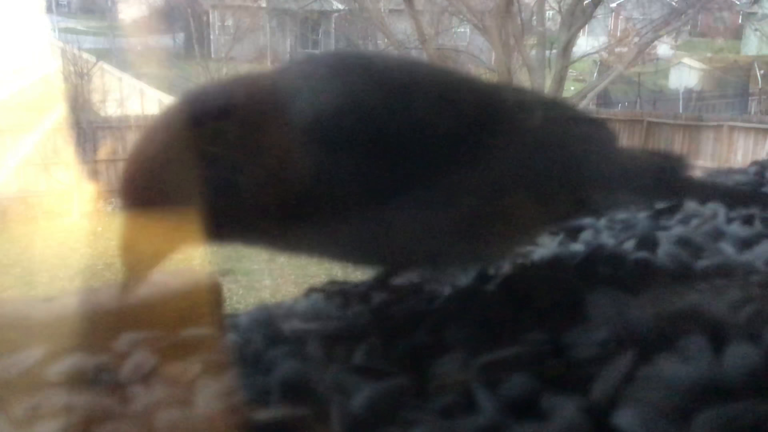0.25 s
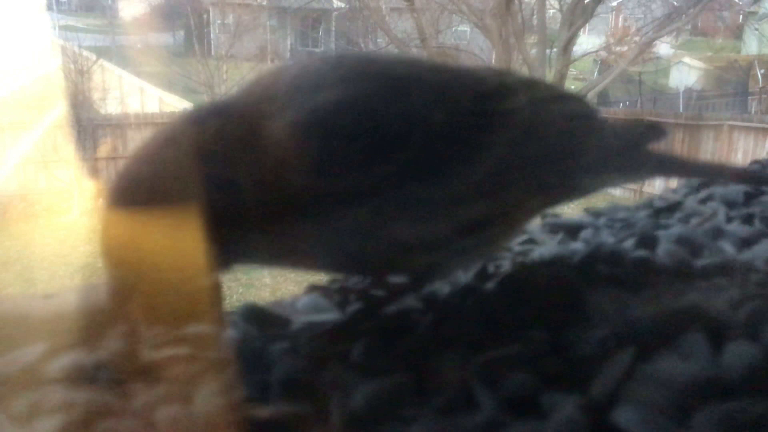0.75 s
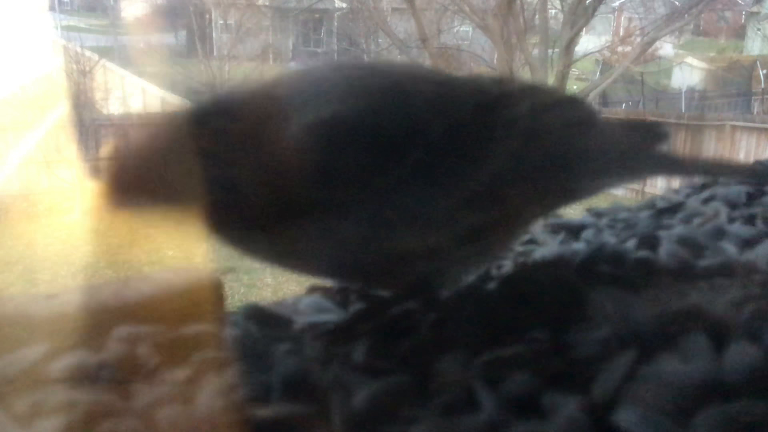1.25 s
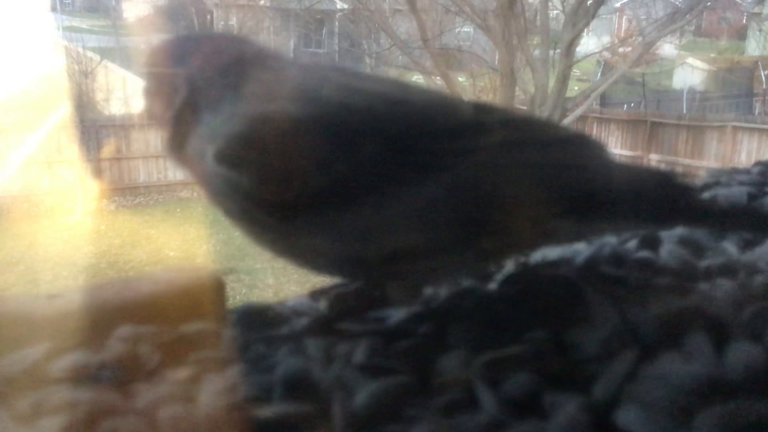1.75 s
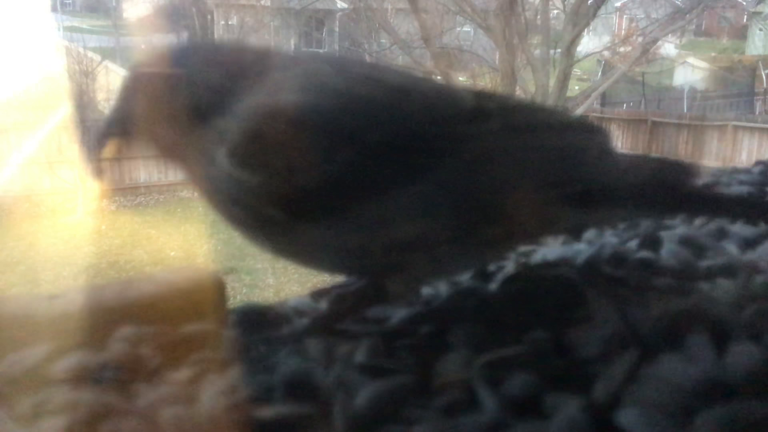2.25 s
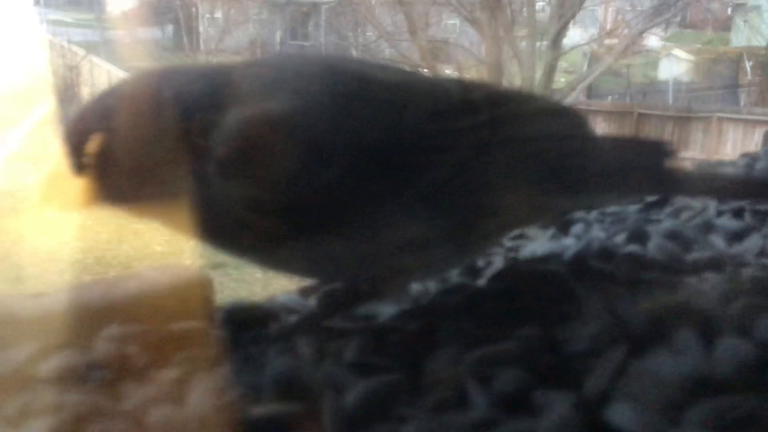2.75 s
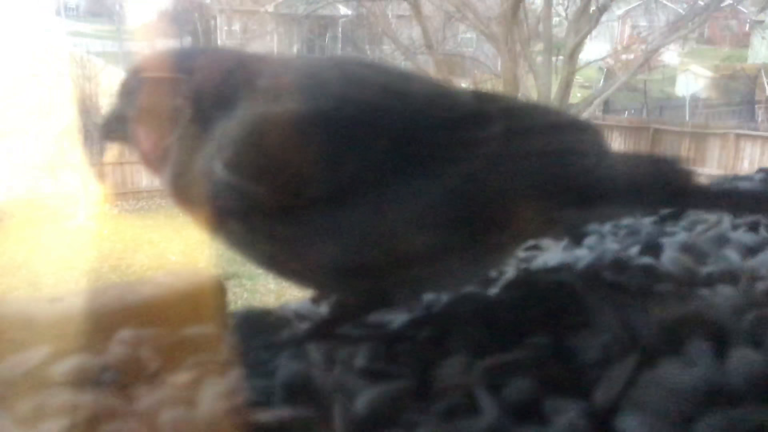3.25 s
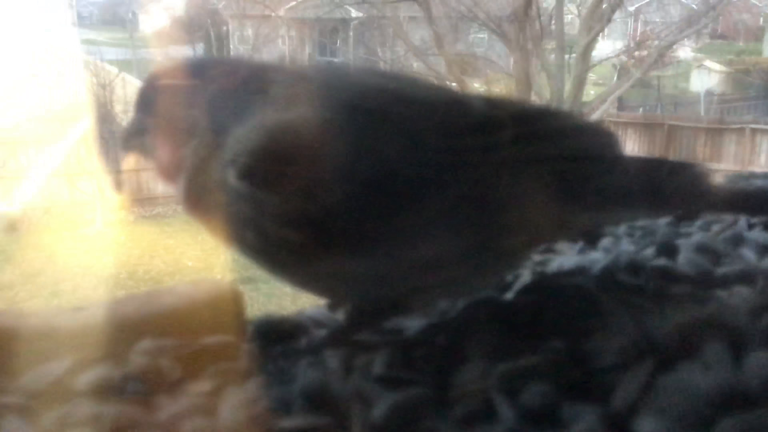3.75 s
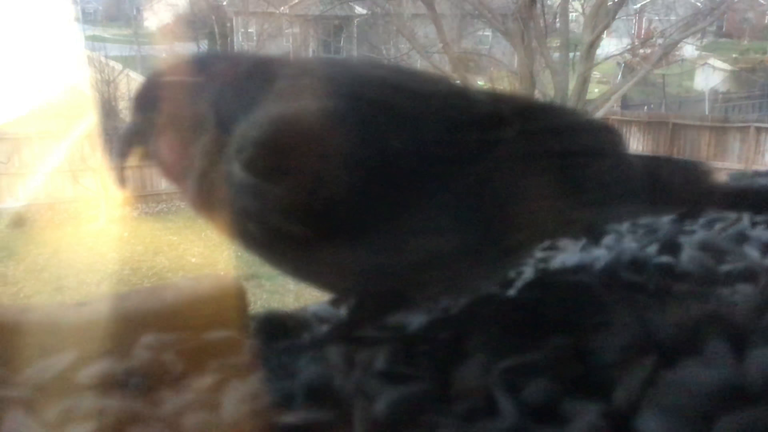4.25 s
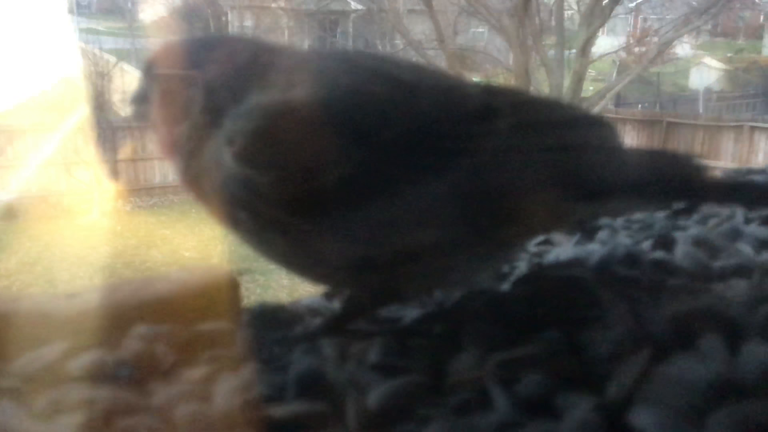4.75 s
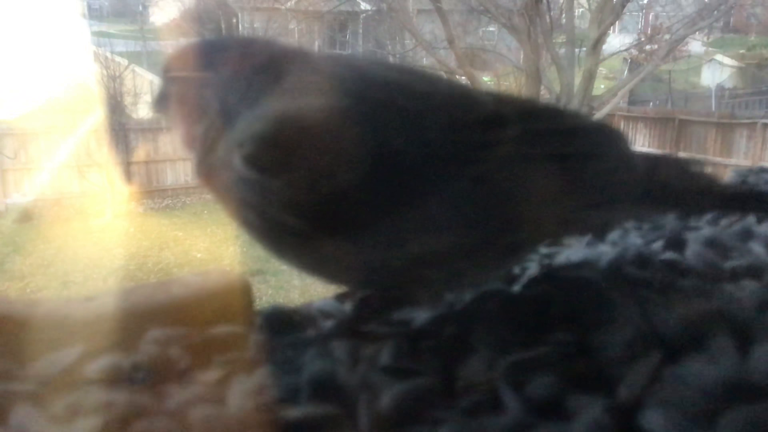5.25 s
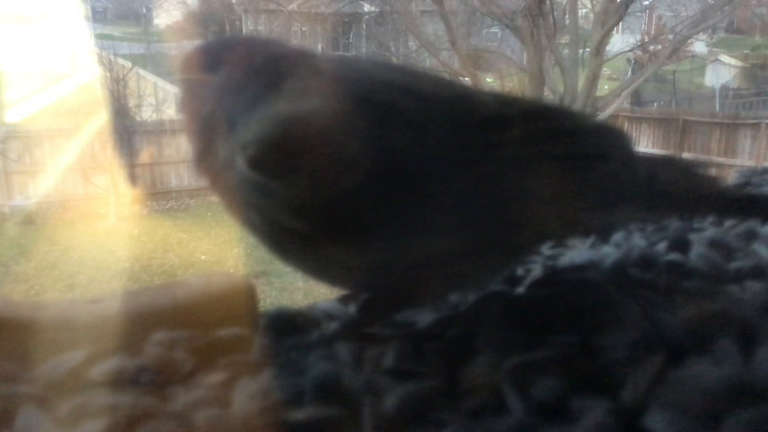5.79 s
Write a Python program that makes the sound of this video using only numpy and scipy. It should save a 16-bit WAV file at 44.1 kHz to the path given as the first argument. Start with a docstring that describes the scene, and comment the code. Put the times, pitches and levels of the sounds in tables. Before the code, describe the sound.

Sharp, irregular pecks and seed clicks with brief dry rustles sound through a window pane, over a low wavering indoor hum and faint hiss.

```python
"""Bird at a window feeder

A small bird picks at seeds in a feeder fixed to a window, heard from the room behind the glass.
Pecks and seed snaps cross the pane as quick falling chirps; loose seeds tick and rustle around them.
Indoors two wavering low tones throb over rumble and faint hiss, with a few soft low shuffles
and one faint swish, both made of swelling random contacts."""
import sys
import numpy as np
from scipy import signal
from scipy.fft import rfft, irfft
from scipy.io import wavfile
from scipy.ndimage import uniform_filter1d

SR = 44100
rng = np.random.default_rng(int(sys.argv[2]) if len(sys.argv) > 2 else 0)


def master(y):
    """Save y as 16-bit WAV."""
    cut = np.clip(np.atleast_2d(y).T, -1, 1)
    pcm = np.round(cut * 32767)  # scale
    wavfile.write(sys.argv[1], SR, pcm.astype(np.int16))


N = 265482

# Pecks and seed snaps: (time [s], strength [dB], knock pitch [Hz], thump near 300 Hz [dB],
# edge near 3.5 kHz [dB], snap near 8 kHz [dB]); last three re knock, before the trims in contact_points
PECK_EVENTS = [(0.1929, -31.5, 980, 7, 0.5, 13), (0.321, -20, 1400, -9, -11, -16),
               (0.4592, 16, 883, -12, -28, -48), (0.462, -0.5, 1740, -28, -22, -39),
               (0.65, -18.5, 1420, -2, -32, -27), (1.078, -8, 950, 0.5, -17.5, -21),
               (1.1597, -12, 900, -4, -10.5, -20), (1.2281, -13, 1090, -5.5, -20.5, -31),
               (1.4231, -3.5, 1430, -7, -26, -46), (1.4395, -4.5, 1430, -12, -9, -8),
               (1.458, 1.5, 1370, -19, -8.5, -16), (1.4663, -6, 1270, -13, -7, -33),
               (1.4995, 12.5, 1300, -7, -21.5, -34), (1.509, -7.5, 1190, -11, -5, -8.5),
               (1.5516, -21, 1260, -14, -5, -1), (1.5645, -12, 1390, -7, -3, -6),
               (1.602, -15, 1290, -12, -7, -9), (1.6191, -9.5, 1300, -11, -1, 2),
               (1.6235, -2.5, 1280, -27, -5, -7), (1.6645, 2, 1370, -23, -1.5, -4),
               (1.7027, -13, 1280, -24, -12, -20), (1.763, -24, 1130, -8, -13, -27),
               (1.7805, -13, 1260, -19, -12.5, -13.5), (2.1508, -7, 1160, -29, -18.5, -21.5),
               (2.1542, 7, 1090, 0.5, -25.5, -48), (2.1855, -21, 980, -6, -12.5, -13),
               (2.7113, -14.5, 940, 9, -35, -36), (3.0795, -18, 850, 8, -22.5, -36.5),
               (3.2716, -19, 1070, 5, -3.5, -11), (3.2979, -21, 1235, 4, -5, -4.5),
               (3.3185, 5, 1160, -10, -16.5, -16.5), (3.3212, -5, 1420, -4, -7, -15),
               (3.3864, -12.5, 1167, -14, -2.5, -15.5), (3.4152, -11.5, 1087, -16, -6, -14),
               (3.5088, -14.5, 1310, -8, -5.5, -13.5), (3.6399, 0, 1125, -6.5, -13.5, -45),
               (3.653, -18, 1160, -8, -11, -23.5), (3.9315, -28.5, 1255, -3, -9, -17),
               (3.9565, -41.5, 780, -5, 4, 3), (4.5458, -13, 1211, -1.5, -6.5, -27),
               (4.5759, -21, 1190, 0, -1, -14), (4.7393, -19, 1190, 5, -12.5, -19),
               (4.9873, -5.5, 1285, -4.5, -5.5, -13), (5.0008, -7, 1438, -0.5, -0.5, 0),
               (5.031, -10, 1155, -12, 5, 2), (5.0354, -10.5, 1180, -6, -6, 8.5),
               (5.0416, 0, 1400, -20, 2, -9), (5.044, -3, 1250, -14, -18, -5),
               (5.0558, -13, 1380, -20, -1, 6), (5.0825, 8, 1270, -3, -7, -5),
               (5.0963, -9, 1230, -19, -10, -13), (5.1983, -10, 920, -11, -13, -18),
               (5.209, -18, 1111, -14, -14, -2.5), (5.2372, -18, 1340, -9, -3, -0.5),
               (5.2765, -21, 1068, -11, -4, -8), (5.2909, -7, 1245, -17.5, -10.5, -16),
               (5.497, -11, 1240, -0.5, -10.5, -12.5), (5.503, -10.5, 1450, -8, -19, -38)]
# Loose seeds tumbling: (start [s], end [s], first tick strength [dB], last tick strength [dB]), before scatter
SPILL_EVENTS = [(1.385, 1.478, -23, -11.5), (1.485, 1.595, -19, -23), (3.33, 3.444, -21, -27),
                (3.485, 3.544, -25, -26), (4.529, 4.651, -24.5, -32.5), (4.996, 5.075, -16, -17),
                (5.116, 5.281, -22, -22.5)]
# Feeder and pane resonances: (frequency [Hz], width [Hz], lift [dB]); negative lift is a notch
FEEDER_MODES = [(268.3, 29, 7.5), (319.5, 18, -7.5), (387.5, 27, 6), (1413, 210, 6), (2090, 280, 4),
                (2700, 360, 5.5), (3146, 82, 4), (4640, 210, 4), (5180, 230, 5.5), (6710, 750, 7),
                (8800, 950, 5.5), (11700, 290, 2.5), (13500, 1000, -4)]
# Pane and room ring: (band centre [Hz], level re direct sound of a 3 dB blow [dB], t60 [s], rise [s])
RING_BANDS = [(130, 4, 0.055, 0.005), (298, 3, 0.055, 0.00084), (730, -8.5, 0.075, 0.00058),
              (1460, -4.5, 0.035, 0.00024), (3100, -10, 0.019, 0.0005), (6900, -15.5, 0.03, 0.00049),
              (15000, -22.5, 0.02, 0.00081)]
# Bird stirring the seeds: (start [s], fullest [s], end [s], level [dB], brightness [dB per octave]);
# the sound is cut at its end, even if that comes before the fullest point
STIR_EVENTS = [(.30, .328, 0.36, -52.5, -4), (.70, .77, 0.93, -63.5, -2), (1.03, 1.085, 1.2, -55.5, -2),
               (1.385, 1.44, 1.53, -44.5, 0.5), (1.47, 1.495, 1.58, -45, 0.5),
               (1.51, 1.575, 1.83, -55.5, 1), (2.16, 2.185, 2.6, -71.5, -1), (3.25, 3.272, 3.31, -50.5, 0),
               (3.31, 3.33, 3.47, -49, 0.5), (3.64, 3.655, 3.79, -62.5, -0.5), (4.52, 4.55, 4.61, -54, 0),
               (4.987, 4.997, 5.04, -36, 2.5), (5.0, 5.05, 5.17, -38.5, 2.5), (5.07, 5.11, 5.08, -52, -12),
               (5.17, 5.215, 5.33, -56, 1.5), (5.25, 5.278, 5.4, -57, -1.5), (5.494, 5.504, 5.54, -48, -4)]
# Seed rustle through the glass: (frequency [Hz], relative density [dB per Hz])
SEED_COLOUR = [(100, -25), (300, 3), (600, 6), (1000, 6.5), (1450, 2.5), (1950, -8), (3500, -8.5),
               (7000, -16), (9000, -25), (11000, -31), (16000, -38)]
# Soft low shuffles: (start [s], fullest [s], end [s], level [dB], brightness [dB per octave])
SHUFFLE_EVENTS = [(0, .07, 0.32, -56, -0.5), (2.58, 2.66, 2.93, -53, 0.5), (2.70, 2.714, 2.73, -45.5, 0),
                  (2.74, 2.80, 3.15, -51.5, -5.5), (2.81, 2.868, 2.9, -47, -0.5),
                  (2.89, 2.92, 2.993, -49, -1), (3.05, 3.085, 3.11, -45, 0), (4.72, 4.76, 4.85, -54.5, 0.5)]
# Shuffle spectrum: (frequency [Hz], relative density [dB per Hz])
SHUFFLE_COLOUR = [(50, -26), (110, 3), (170, 4), (260, -10), (350, -5.5), (600, -17), (850, -17),
                  (1800, -31.5), (6000, -43.5), (16000, -46)]
# Faint swish: (start [s], fullest [s], end [s], level [dB], brightness [dB per octave])
SWISH_EVENTS = [(2.58, 2.70, 2.91, -71, -2)]
# Swish spectrum: (frequency [Hz], relative density [dB per Hz])
SWISH_COLOUR = [(300, -15), (1500, -1), (4000, -2), (6500, 5), (9000, -6), (14000, -24)]
# Hum tones: (mean frequency [Hz], gain on HUM_LEVELS [dB], rms pitch waver [Hz], throb depth [dB])
HUM_TONES = [(92.25, 2, 2.63, 4), (121.2, 1.5, 2.23, 4)]
# Slow hum level: (time [s], lower tone [dB], upper tone [dB])
HUM_LEVELS = [(0.0, -50.5, -64), (0.45, -52.5, -55), (0.65, -51, -50.5), (1.05, -49, -57.5),
              (1.2, -54.5, -55), (1.5, -50, -50.5), (1.8, -53.5, -58.0), (2.2, -46, -59),
              (2.55, -55.5, -55), (2.95, -49, -58), (3.5, -57, -52.5), (3.8, -50.5, -52), (4.1, -50, -59.5),
              (4.7, -53, -53.5), (5.15, -52.5, -55.5), (5.35, -60.5, -56.5), (5.8, -51, -56),
              (6.01, -59, -61)]
# Still room and microphone hiss: (frequency [Hz], relative density [dB per Hz])
ROOM_COLOUR = [(20, -25), (32, -23), (48, -10.5), (72, -1.5), (100, -1), (140, 0), (170, -9), (260, -12),
               (430, -16.5), (800, -24.5), (1400, -29.5), (2500, -36.5), (6500, -39.5), (16000, -46)]
# Bumps in that spectrum: (frequency [Hz], width [Hz], lift [dB])
ROOM_MODES = [(81, 17, 4.5), (227.8, 7.3, 3.5), (427.7, 12, 7.5), (7950, 840, 6.5), (10520, 1400, 7),
              (13900, 1000, 8)]

TICKS_PER_S, TICK_SPREAD_DB = 75, 2
TICK_HZ, TICK_PITCH_SPREAD = 1160, 0.074  # centre knock pitch, relative scatter
TICK_THUMP_DB, TICK_EDGE_DB, TICK_SNAP_DB, TICK_HARDNESS_SPREAD_DB = -6.5, -7, -14, 2.5
TICK_TRADE = 0.62  # knock lost per dB of hardness [dB]
WAVER_RATE_HZ, THROB_RATE_HZ = 9.15, 13.2
BAND_EDGE_HZ = 16300


def gain_of(db):
    """Decibels to amplitude."""
    return 10 ** (np.asarray(db) / 20)


def evened(x):
    """Scales to rms 1."""
    return x / np.sqrt(np.mean(x ** 2) + 1e-20)


def read(points, hz):
    """Interpolates (Hz, value) points on a log-frequency axis."""
    point_hz, value = np.transpose(points)
    return np.interp(np.log(hz + 1), np.log(point_hz + 1), value)


def bumps(modes, hz):
    """Summed lift in dB of a set of resonances."""
    return sum(db / (1 + (2 * (hz - centre_hz) / width_hz) ** 2) for centre_hz, width_hz, db in modes)


def add(mix, start_s, sound):
    """Mixes a sound in at start_s."""
    part = mix[max(round(start_s * SR), 0):][:len(sound)]
    part += sound[:len(part)]


def causal(db):
    """Minimum-phase spectrum with these levels: rings only after its onset."""
    log_gain = np.log(gain_of(db))
    circle = np.concatenate([log_gain, log_gain[-2:0:-1]])
    return np.exp(np.conj(signal.hilbert(circle)))[:len(db)]


def wander(rate_hz):
    """Slow random motion of rms 1, up to about rate_hz."""
    hz = np.fft.rfftfreq(N, 1 / SR)
    return evened(irfft(rfft(rng.standard_normal(N)) * np.exp(-(hz / rate_hz) ** 2), N))


def contact_points(knock_hz, thump, edge, snap, below_db=-3.0, above_db=-1, dip_db=-1,
                   top_db=-20, dulling=0.15, sub_db=-8, edge_db=-2, snap_db=-3):
    """Contact spectrum as (Hz, dB) points; a soft contact loses its highest treble first."""
    top = top_db + dulling * snap
    return sorted([
        (30, thump - 30), (120, thump + sub_db), (300, thump - 4), (460, 0.41 * thump - 7),
        (0.7 * knock_hz, below_db), (0.92 * knock_hz, 1.5), (1.067 * knock_hz, above_db),
        (np.sqrt(3300 * knock_hz), 0.83 * edge + dip_db - 4.0),
        (3500, edge + edge_db), (7800, snap + snap_db), (11000, snap + 0.64 * top), (16000, snap + top)])


def pecks(rows, level_db=0, delay_1khz_s=0.001571, crumble_s=0.00064, crumble_hz=2300,
          firmness=0.58, nearness=0.55, size=8192):
    """Short blows on crumbling husks travel as bending waves in the glass, followed by a diffuse ring."""
    hz, t, out = np.fft.rfftfreq(size, 1 / SR), np.arange(size) / SR, np.zeros(N)
    # bending-wave speed grows as the root of frequency, so treble arrives first
    glass = np.exp(-4j * np.pi * delay_1khz_s * hz / np.sqrt(hz / 1000 + 1e-9))
    body_db = bumps(FEEDER_MODES, hz)

    centres_hz = [row[0] for row in RING_BANDS]
    bands = np.sqrt([read(list(zip(centres_hz, one)), hz) for one in np.eye(len(RING_BANDS))])
    fades = []
    for _, ring_db, t60_s, rise_s in RING_BANDS:
        envelope = (1 - np.exp(-t / rise_s)) ** 2 * np.exp(-np.log(1000) * t / t60_s)
        fades.append(gain_of(ring_db) * evened(envelope))
    fades = np.array(fades)

    # the husk starts to give way just before the beak lands
    giving = t * np.exp(-t / crumble_s)
    landing = np.exp(-2j * np.pi * hz * crumble_s)
    for time_s, db, knock_hz, thump, edge, snap in rows:
        contact_db = read(contact_points(knock_hz, thump, edge, snap), hz)
        ring_noise = fades * rng.standard_normal(fades.shape)
        ring = (bands * rfft(ring_noise)).sum(0) / np.sqrt(size)
        crumble = rfft(evened(giving * rng.standard_normal(size))) / np.sqrt(size)
        # firm blows stay one clean push up to a higher pitch; light ones are mostly crumble
        clean = 1 / (1 + (hz / (crumble_hz * gain_of(firmness * db))) ** 4)
        force = np.sqrt(clean) * landing + np.sqrt(1 - clean) * crumble
        # loud blows land nearer and sound drier
        wet = gain_of(-nearness * np.clip(db - 3.0, -10, 25))
        blow = force * causal(contact_db + body_db) * glass * (1 + wet * ring)
        add(out, time_s - crumble_s, gain_of(db + level_db) * irfft(blow)[:size * 3 // 4])
    return out


def tumbles():
    """Peck rows for loose seeds: unevenly spaced ticks, each of its own strength, pitch and hardness."""
    rows = []
    for start_s, end_s, first_db, last_db in SPILL_EVENTS:
        late, chance = rng.random(size=32), rng.standard_normal(size=(32, 3))
        times_s = start_s + (np.arange(len(late)) + late) / TICKS_PER_S
        for time_s, (loud, pitch, hard) in zip(times_s, np.clip(chance, -2, 2)):
            if time_s < end_s:
                db = np.interp(time_s, [start_s, end_s], [first_db, last_db]) + TICK_SPREAD_DB * loud
                hard_db = TICK_HARDNESS_SPREAD_DB * hard
                knock_hz = TICK_HZ * np.exp(TICK_PITCH_SPREAD * pitch)
                rows.append((time_s, db - TICK_TRADE * hard_db, knock_hz, TICK_THUMP_DB,
                             TICK_EDGE_DB + hard_db, TICK_SNAP_DB + hard_db))
    return rows


def rustle(rows, colour, modes, grains_per_s, spread_db, smooth, fade_db, size=32768):
    """Swells of tiny random contacts over a smooth rub, rung through a body."""
    hz, out = np.fft.rfftfreq(size, 1 / SR), np.zeros(N)
    colour_db = read(colour, hz) + bumps(modes, hz)
    octaves = np.log2(np.clip(hz, 200, 8000))
    for start_s, full_s, end_s, db, bright in rows:
        sizes = gain_of(spread_db * np.minimum(rng.exponential(1, size), 3))
        grains = rng.choice([-1, 1], size) * sizes * (rng.random(size) < grains_per_s / SR)
        drive = evened(grains) + smooth * rng.standard_normal(size)
        t = start_s + np.arange(size) / SR
        swell_db = np.interp(t, [start_s, full_s, end_s], [fade_db, 0, fade_db])
        swell = gain_of(swell_db) * (t < end_s)
        body = causal(colour_db + bright * octaves)
        body = body / np.sqrt(np.mean(abs(body) ** 2))
        add(out, start_s, gain_of(db) * irfft(rfft(drive * swell) * body))
    return out


def patchy(x, patch_db=4, size=128):
    """Each seed that shifts has a colour of its own, lasting a few milliseconds."""
    z = signal.stft(x, nperseg=size)[2]
    across_hz = uniform_filter1d(rng.standard_normal(z.shape), size=4, axis=0)
    patches = evened(uniform_filter1d(across_hz, size=3, axis=1))
    patch_gain = evened(gain_of(patch_db * np.clip(patches, -2, 2)))
    return signal.istft(z * patch_gain, nperseg=size)[1][:N]


def stirred_seeds():
    """Seeds stirred by the bird: patchy contact noise through feeder and pane."""
    return patchy(rustle(STIR_EVENTS, SEED_COLOUR, FEEDER_MODES,
                         grains_per_s=900, spread_db=3.0, smooth=0.5, fade_db=-21.5))


def shuffles():
    """Soft low shuffles in the room: sparse contacts, mostly bass."""
    return rustle(SHUFFLE_EVENTS, SHUFFLE_COLOUR, [],
                  grains_per_s=340, spread_db=2.5, smooth=0.46, fade_db=-20.0)


def swish():
    """Faint bright swish among the shuffles: dense contacts over a strong smooth rub."""
    return rustle(SWISH_EVENTS, SWISH_COLOUR, [],
                  grains_per_s=5000, spread_db=2, smooth=0.8, fade_db=-18)


def hum(ceiling=1.37):
    """Two low tones that swell slowly, waver in pitch and throb at random: deep dips, limited tops."""
    time_s, *levels_db = np.transpose(HUM_LEVELS)
    t, out = np.arange(N) / SR, np.zeros(N)
    for (mean_hz, gain_db, waver_hz, throb_db), level_db in zip(HUM_TONES, levels_db):
        throb = throb_db * np.minimum(wander(THROB_RATE_HZ), ceiling)
        pitch_hz = mean_hz + waver_hz * wander(WAVER_RATE_HZ)
        tone = np.sin(2 * np.pi * np.cumsum(pitch_hz) / SR)
        out += gain_of(gain_db + np.interp(t, time_s, level_db) + throb) * tone
    return out


def room(level_db=-57, swell_db=0.13):
    """Shaped noise: rumble that swells a little, and steady microphone hiss."""
    hz = np.fft.rfftfreq(N, 1 / SR)
    z = rfft(rng.standard_normal(N)) * gain_of(read(ROOM_COLOUR, hz) + bumps(ROOM_MODES, hz))
    low = 1 / (1 + (hz / 1500) ** 2)
    rumble = irfft(z * low, N) * gain_of(swell_db * wander(1.34))
    hiss = irfft(z * (1 - low), N)
    return gain_of(level_db) * evened(rumble + hiss)


def scene():
    """Bird, feeder and room, in mono."""
    indoors = hum() + room()
    stirred = stirred_seeds()
    movement = shuffles() + swish()
    blows = pecks(list(PECK_EVENTS) + tumbles())
    return (blows + stirred + movement + indoors)[None]


def record(dry, low_cut_hz=42):
    """The microphone's bass cut, then the recorder's band limit."""
    bass_cut = signal.butter(3, low_cut_hz, "highpass", fs=SR, output="sos")
    thinned = signal.sosfilt(bass_cut, dry)
    band_limit = signal.firwin(511, BAND_EDGE_HZ, window=("kaiser", 9), fs=SR)
    return signal.oaconvolve(thinned, band_limit[None], "same")


dry = scene()
out = record(dry)
master(out)
```